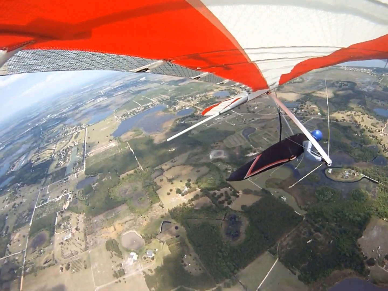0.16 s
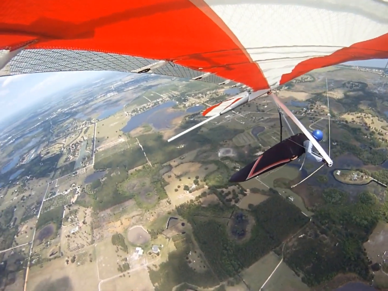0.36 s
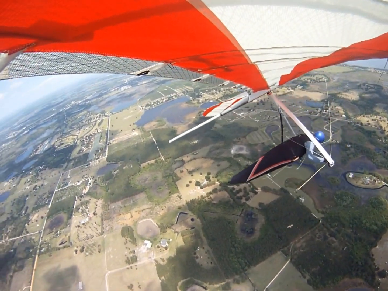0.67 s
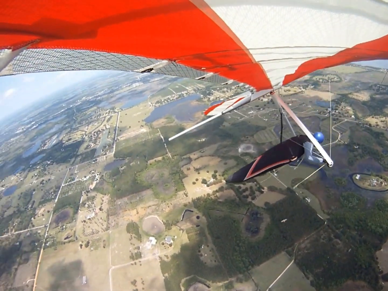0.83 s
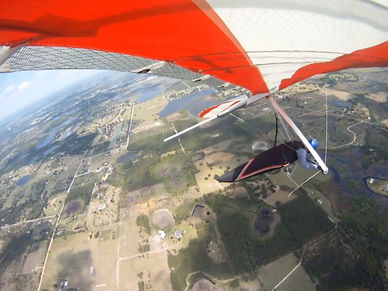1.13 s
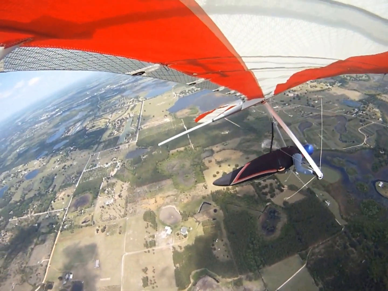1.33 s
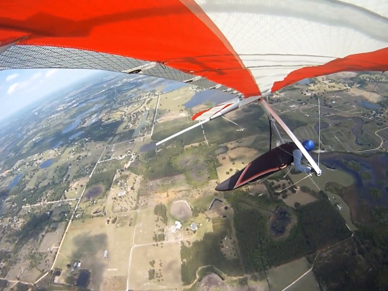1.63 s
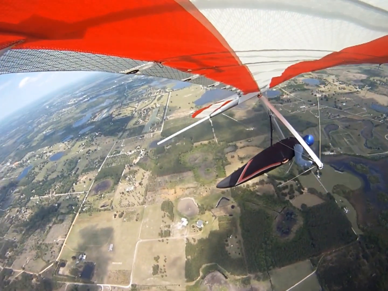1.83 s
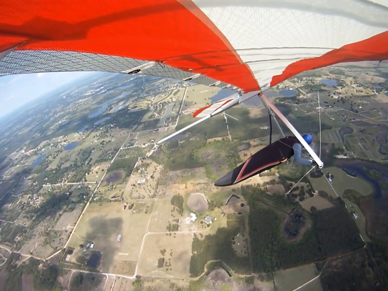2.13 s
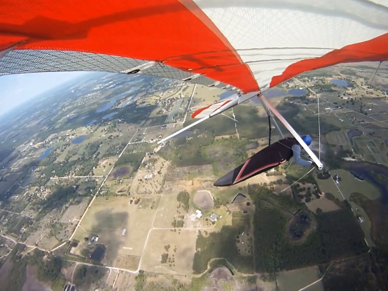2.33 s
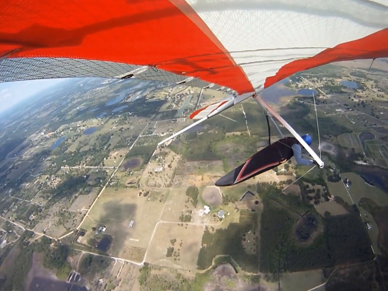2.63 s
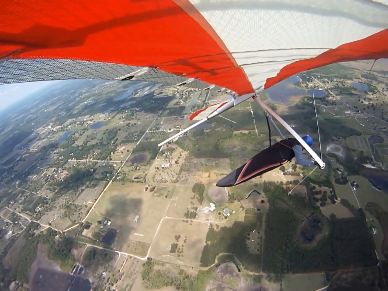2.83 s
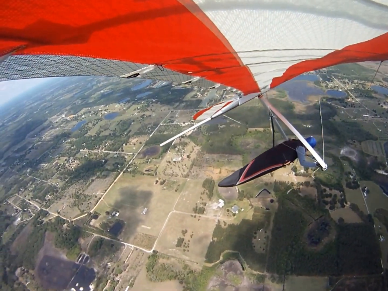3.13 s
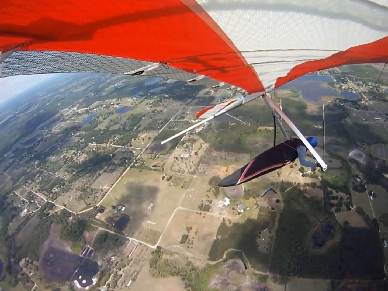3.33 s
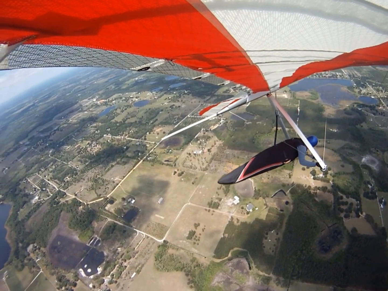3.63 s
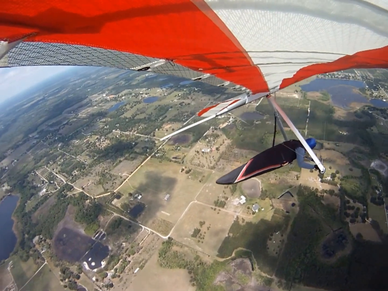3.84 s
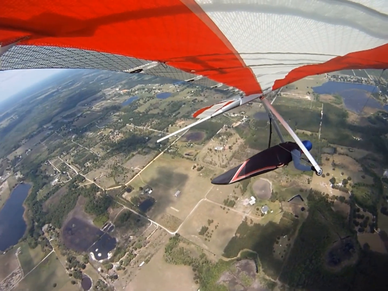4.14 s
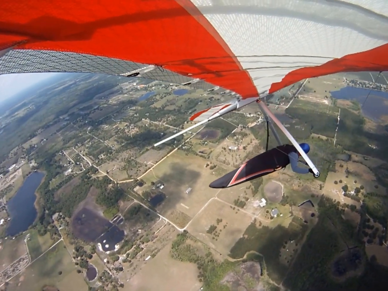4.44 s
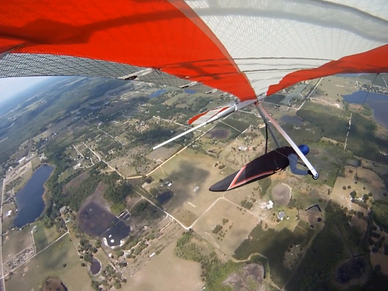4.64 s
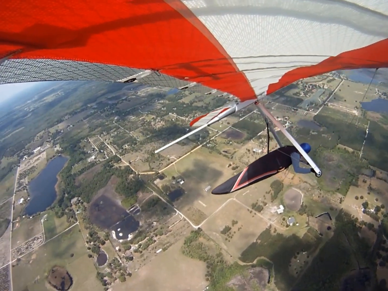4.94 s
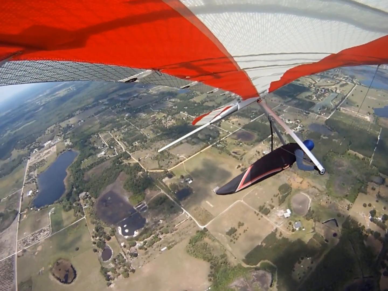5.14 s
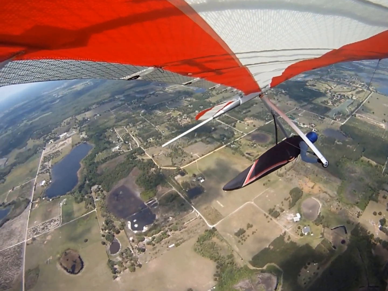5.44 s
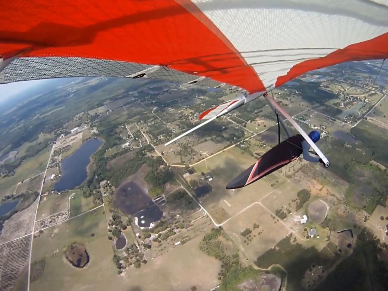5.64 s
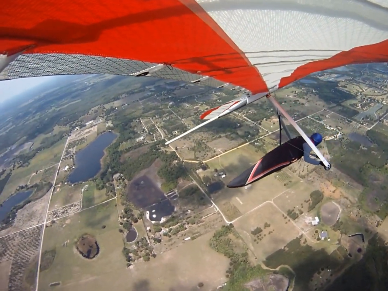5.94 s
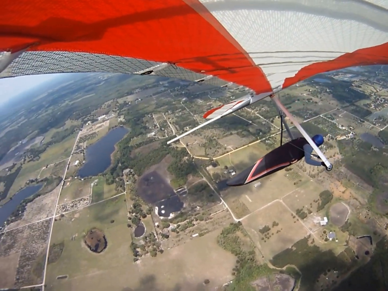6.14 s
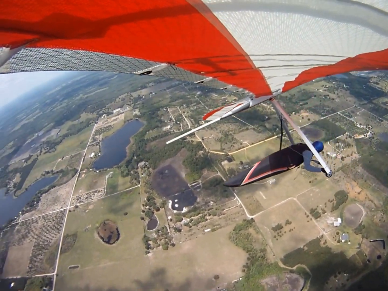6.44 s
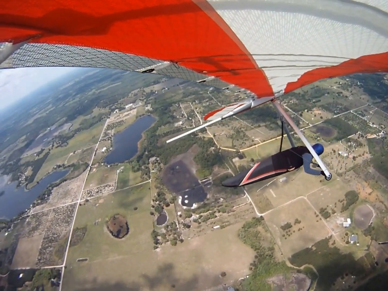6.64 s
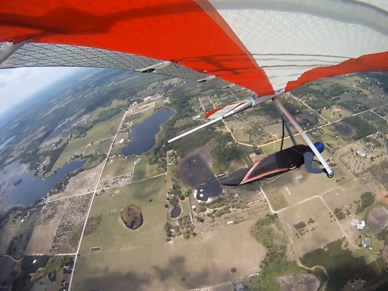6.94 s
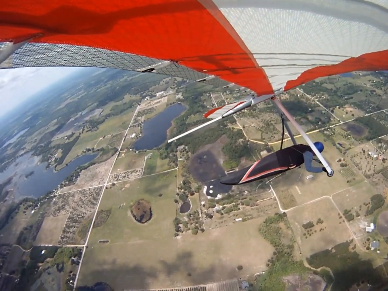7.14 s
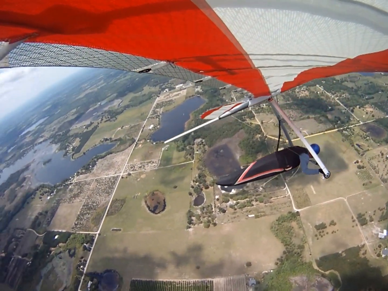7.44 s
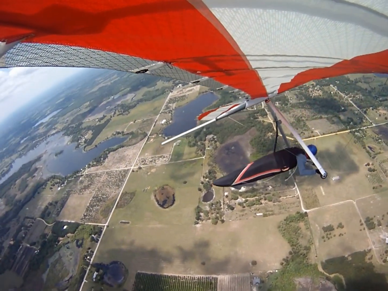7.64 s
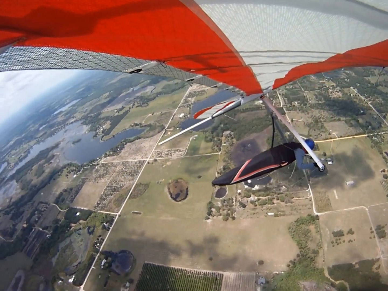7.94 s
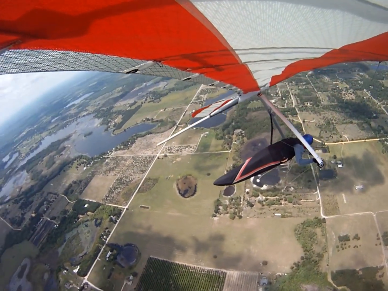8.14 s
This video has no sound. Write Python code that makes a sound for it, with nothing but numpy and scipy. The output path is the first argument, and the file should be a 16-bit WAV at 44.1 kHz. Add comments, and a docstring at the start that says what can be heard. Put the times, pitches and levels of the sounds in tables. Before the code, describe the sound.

Close, blustery wind noise fills the whole stretch, already going at the start. Dense low buffeting is broken by irregular heavy thumps that make the level dip briefly, with fine airy turbulence hissing above. Scattered small hard clicks come from the camera mount. Open sky, no echo; a cheap small microphone in the airflow gives a coarse, rough treble.

```python
"""Wind rushes over a small camera fixed to the wing of a glider in flight.
From the start small eddies rumble (random suction dips on coloured noise) and fine turbulence hisses.
Within 0.1 s the first deep eddy rolls across the microphone port: a suction pulse, then many more.
From 0.5 s the mount ticks now and then: struck, decaying resonances.
Throughout, the recorder ducks after strong peaks and holds coarse samples, mirroring sound into the treble."""
import sys
import numpy as np
from scipy import signal
from scipy.fft import rfft, irfft, next_fast_len
from scipy.io import wavfile
from scipy.ndimage import uniform_filter1d

SR = 44100
rng = np.random.default_rng(int(sys.argv[2]) if len(sys.argv) > 2 else 0)


def materialize(psi):
    """Save the field psi as 16-bit PCM at rate SR to the path in sys.argv[1].

    A 1-D psi becomes a single channel; in a 2-D psi each row is a channel.
    """
    bounded = np.clip(np.atleast_2d(psi).T, -1, 1)
    quanta = np.round(bounded * 32767).astype(np.int16)
    wavfile.write(sys.argv[1], SR, quanta)


N = 365368  # samples


def from_db(db):
    """Amplitude factor of a level in dB."""
    return 10 ** (np.asarray(db) / 20)


def rms_one(x):
    """Scale to an RMS of 1."""
    return x / np.sqrt(np.mean(x ** 2) + 1e-20)


def colour(x, spectrum):
    """Zero-phase colouring: a click becomes a pulse symmetrical about its centre."""
    size = next_fast_len(N + SR // 2)
    hz, db = np.transpose(spectrum)
    grid_hz = np.maximum(np.arange(size // 2 + 1) * SR / size, 1)
    gain = from_db(np.interp(np.log(grid_hz), np.log(hz), db))
    return irfft(rfft(x, size) * gain, size)[:N]


# spectrum shape of the eddies' pressure: (frequency [Hz], relative density [dB per Hz])
RUMBLE_SPECTRUM = [(12, -43), (20, -26), (76, -4), (173, 0.5), (257, -3.5), (344, -8.5), (659, -11.5),
                   (1200, -25), (1560, -34.5), (2640, -120)]
SMALL_EDDIES_PER_S, EDDY_POWER_SHARE = 280, 0.49


def rumble(level_db):
    """Many small suction dips at random times, on a smooth churn of the same colour."""
    born = rng.random(N) < SMALL_EDDIES_PER_S / SR
    strength_db = 3.8 * np.minimum(rng.exponential(1, N), 1.3)
    suction = -rms_one(born * from_db(strength_db))
    churn = rng.standard_normal(N)
    mixed = np.sqrt(EDDY_POWER_SHARE) * suction + np.sqrt(1 - EDDY_POWER_SHARE) * churn
    return from_db(level_db) * rms_one(colour(mixed, RUMBLE_SPECTRUM))


def drift(corner_hz):
    """Slow random drift, RMS 1: noise through two equal one-pole low-passes, run in."""
    step = 40  # samples per drift value
    r = np.exp(-2 * np.pi * corner_hz * step / SR)
    noise = rng.standard_normal(N // step + 2002)
    slow = signal.lfilter([1], [1, -2 * r, r * r], noise)[2000:]
    return np.interp(np.arange(N) / step, np.arange(len(slow)), rms_one(slow))


# spectrum shape of turbulence in the housing: (frequency [Hz], relative density [dB per Hz])
HISS_SPECTRUM = [(650, -13), (1100, -4), (1650, -5.5), (2320, -5), (2950, -7), (3500, -15), (3920, -9.5),
                 (4750, -25), (6000, -31), (7800, -67), (13200, -120)]
SLOW_FLUTTER_DB, FAST_FLUTTER_DB = 0.5, 0.92  # RMS


def hiss(level_db):
    """Fine turbulence as coloured noise that flutters quickly in strength."""
    flutter_db = SLOW_FLUTTER_DB * drift(8.0) + FAST_FLUTTER_DB * drift(160)
    noise = colour(rng.standard_normal(N), HISS_SPECTRUM)
    return from_db(level_db + flutter_db) * rms_one(noise)


# deepest eddies, strength before the core is rounded: (time [s], strength [dB])
DEEP_EDDIES = [(0.0471, -2.4), (0.2007, -0.7), (0.4326, -2.7), (0.4556, -3.0), (0.5124, -0.5),
               (0.7756, -2.6), (0.9935, -2.4), (1.1166, -2.9), (1.4463, -2.5), (1.6823, -1.3),
               (1.8876, -1.5), (2.0951, -3.6), (2.1633, -3.6), (2.4128, -2.8), (2.4838, -1.2),
               (2.6805, -0.7), (2.7774, -1.7), (2.8784, -3.4), (3.1188, -3.1), (3.1494, -2.9),
               (3.4477, -3.2), (3.509, -1.1), (3.872, -2.5), (3.9579, -2.0), (4.1149, -2.6), (4.3415, -0.9),
               (4.7019, -3.6), (4.7453, -2.5), (4.9251, -2.9), (5.0825, -2.5), (5.3493, -2.9),
               (5.4914, -1.8), (5.5972, -2.9), (5.7456, -2.7), (5.8518, -2.8), (5.8788, -3.5),
               (5.9185, -2.4), (6.151, -1.3), (6.2335, -3.1), (6.4174, -3.5), (6.5998, -3.2),
               (6.6869, -2.5), (6.959, 1.2), (7.0369, -2.5), (7.1668, -3.5), (7.3394, -2.1), (7.5284, -2.8),
               (7.6501, -2.8), (7.719, -1.2), (7.7579, -3.2), (7.8355, -3.4), (7.9942, -3.3),
               (8.1965, -1.8)]
MEDIAN_WIDTH_MS, WIDTH_LOG_SPREAD = 1.06, 0.16
SWEEP_WIDTHS, SHOULDER = 1.38, 0.99  # sweep in eddy widths


def deep_eddies():
    """Suction cores between overpressure shoulders; also the share of small eddies reaching the port."""
    pressure, passing = np.zeros(N), np.ones(N)
    around = np.arange(-500, 501)  # samples
    widths_ms = MEDIAN_WIDTH_MS * np.exp(WIDTH_LOG_SPREAD * rng.standard_normal(len(DEEP_EDDIES)))
    for (time_s, strength_db), width_ms in zip(DEEP_EDDIES, widths_ms):
        at = round(time_s * SR) + around
        u = around / SR * 1000 / width_ms  # eddy widths from the centre
        core = (1 - SHOULDER * u ** 2) * np.exp(-(u ** 2 + 0.11) ** 0.67)
        pressure[at] -= from_db(strength_db) * core
        passing[at] *= 1 - np.exp(-0.5 * (u / SWEEP_WIDTHS) ** 2)
    return pressure, passing


def clicks(times_s, db):
    """One impulse at each time."""
    out = np.zeros(N)
    out[(times_s * SR).astype(int)] = from_db(db)
    return out


# ticks of the camera mount: (time [s], relative level [dB], extra strength of the lowest mode [dB])
TICKS = [(0.523, -10, -3), (0.6794, -7, -15), (0.9527, -16, -7), (1.7842, -10, -11), (2.5059, -0.5, -9.5),
         (3.0524, -14.5, -12), (3.3667, -8, -6), (4.342, -4.5, -25), (4.6585, -15.5, -8),
         (4.9631, -9.5, -11), (5.459, -9, -11), (5.7583, -12, -8), (7.3647, -10.5, -12), (7.8341, -25, -28)]
# resonances of the mount: (frequency [Hz], relative level [dB], decay by 60 dB [s])
MOUNT_MODES = [(2470, 4.5, 0.015), (3060, -4.5, 0.016), (3380, -2.5, 0.0085), (4700, -11, .010)]
CONTACT_BAND_HZ = [2200, 3980]


def ticks():
    """Each tick strikes the mount's modes, strengths varying; the soft contact dulls the blow."""
    times_s, tick_db, lowest_db = np.transpose(TICKS)
    out = np.zeros(N)
    strength_db = rng.normal(0, 1.0, (len(TICKS), len(MOUNT_MODES)))
    strength_db[:, 0] += lowest_db
    for k, (hz, mode_db, t60_s) in enumerate(MOUNT_MODES):
        r = from_db(-60 / (t60_s * SR))
        w = 2 * np.pi * hz / SR
        blows = clicks(times_s, tick_db + mode_db - 5.0 + strength_db[:, k])
        blows += 1e-18  # avoids denormals
        out += signal.lfilter([0, np.sin(w)], [1, -2 * r * np.cos(w), r * r], blows)
    contact = signal.butter(3, CONTACT_BAND_HZ, "band", fs=SR, output="sos")
    return signal.sosfilt(contact, out)


# airflow over the housing, as hiss level before stir and flutter: (time [s], level [dB])
FLOW = [(0, -29), (0.25, -30.5), (0.48, -30), (0.9, -33), (1.2, -31.5), (1.62, -29.5), (1.85, -29.5),
        (2.22, -33.5), (2.45, -28), (2.62, -30.5), (3, -31.5), (3.25, -33), (3.45, -32), (3.7, -32.5),
        (3.97, -32.9), (4.15, -31), (4.6, -33), (4.8, -33), (4.92, -30.5), (5.25, -33), (5.6, -32.0),
        (5.85, -30.5), (5.95, -32.8), (6.14, -31.5), (6.5, -33), (6.78, -32.5), (6.94, -31), (7.2, -33.5),
        (7.7, -30.5), (8, -31.5), (8.28, -30.5)]
RUMBLE_DB, RUMBLE_DB_PER_FLOW_DB = -15, 0.55  # level at mean flow, before rounding; follow slope
RUMBLE_TOP = 0.66  # pressure where small eddies round off
STIR_DB, STIR_S = 0.89, 0.0031  # RMS swing of the hiss with eddy strength; averaging time


def scene():
    """One airflow drives rumble and hiss; everything reaches one microphone port."""
    times_s, levels_db = np.transpose(FLOW)
    flow_db = np.interp(np.arange(N) / SR, times_s, levels_db)
    churn = rumble(RUMBLE_DB + RUMBLE_DB_PER_FLOW_DB * (flow_db - flow_db.mean()))
    deep, passing = deep_eddies()
    eddies = passing * RUMBLE_TOP * np.tanh(churn / RUMBLE_TOP) + deep
    stir = uniform_filter1d(np.abs(eddies), int(STIR_S * SR))
    stir_db = STIR_DB * rms_one(stir - stir.mean())
    return (eddies + hiss(flow_db + stir_db) + ticks())[None]


DUCK_FROM_DB, DUCK_DB_PER_DB_OVER, MAKEUP_DB = -6.5, 1.0, 1.5
DUCK_LAG_S, ATTACK_S, RECOVER_DB_PER_S = 0.003, 0.0015, 30


def duck(x):
    """Gain control: drops just after a peak over the threshold, climbs back at a steady pace."""
    over_db = np.maximum(20 * np.log10(np.abs(x) + 1e-9) - DUCK_FROM_DB, 0)
    climb_db = RECOVER_DB_PER_S * np.arange(N) / SR
    held_db = np.maximum.accumulate(over_db + climb_db) - climb_db
    late_db = np.interp(np.arange(N) - DUCK_LAG_S * SR, np.arange(N), held_db)
    r = np.exp(-1 / (ATTACK_S * SR))
    smooth_db = signal.lfilter([1 - r], [1, -r], late_db)
    return x * from_db(MAKEUP_DB - DUCK_DB_PER_DB_OVER * smooth_db)


HOLD_HZ = 12000


def hold(x):
    """Low-rate samples held for four steps: mirror images appear around that rate."""
    coarse = signal.resample_poly(x, HOLD_HZ, SR)
    return signal.resample_poly(np.repeat(coarse, 4), SR, 4 * HOLD_HZ)[:N]


STOPBAND_FROM_HZ, STOPBAND_DB = 15450, 50


def record(dry):
    """Gain control, rounded full scale, sample hold, top cut."""
    ducked = duck(dry[0])
    rounded = ducked / (1 + np.abs(ducked / 0.97) ** 6) ** (1 / 6)
    top_cut = signal.cheby2(20, STOPBAND_DB, STOPBAND_FROM_HZ, fs=SR, output="sos")
    return signal.sosfilt(top_cut, hold(rounded))[None]


dry = scene()
out = record(dry)
materialize(out)
```